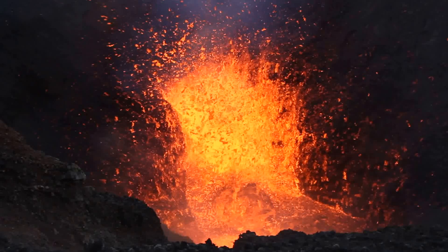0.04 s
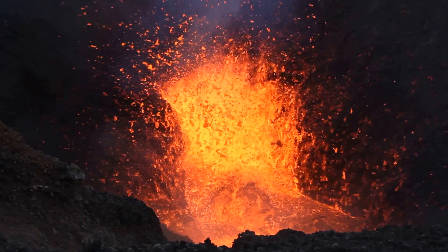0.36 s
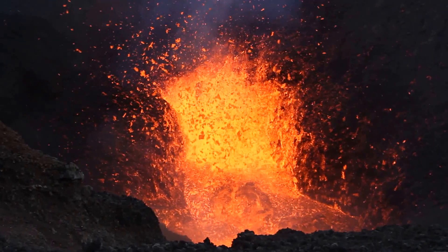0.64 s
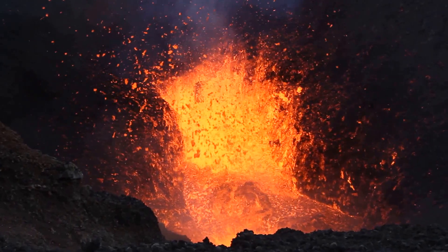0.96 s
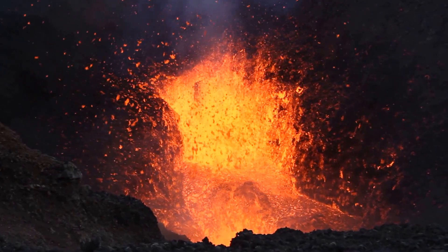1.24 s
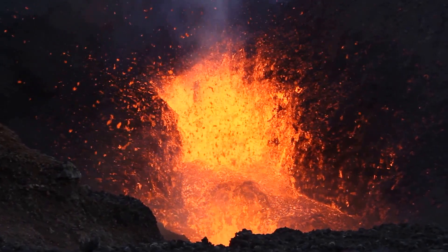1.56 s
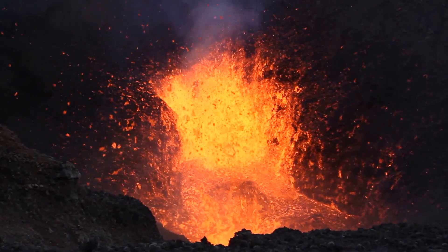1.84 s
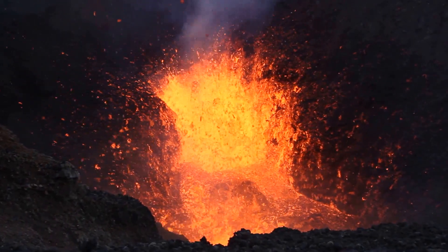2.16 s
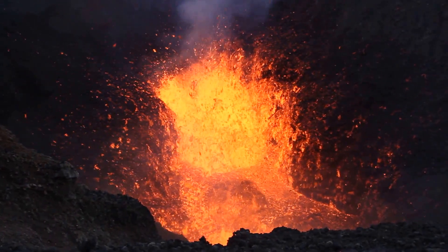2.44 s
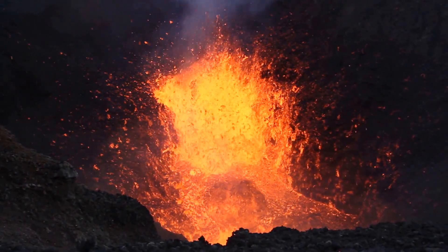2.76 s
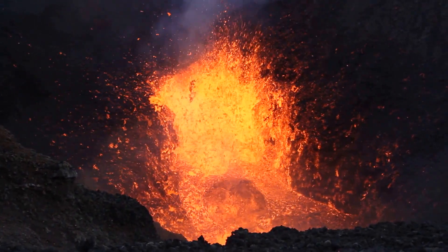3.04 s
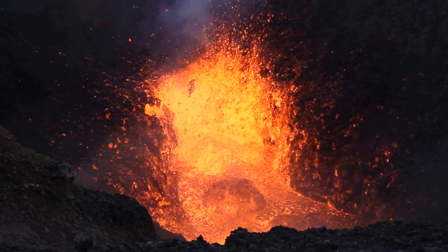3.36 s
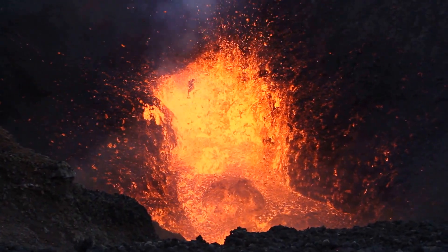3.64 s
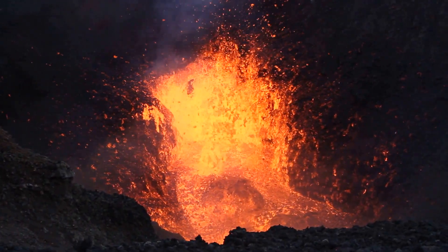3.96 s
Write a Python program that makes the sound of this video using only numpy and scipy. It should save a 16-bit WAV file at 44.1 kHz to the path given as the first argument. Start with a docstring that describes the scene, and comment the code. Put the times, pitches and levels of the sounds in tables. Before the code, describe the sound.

A lava fountain rumbles from the start, some way off outdoors, with a soft grainy hiss of falling spatter and a faint, thin electronic whine. Gas tears through in rough roaring swells, a strong one near 1 second and the biggest from 2.6 seconds, briefly pushing the other sounds down. Wind bumps the microphone, hardest just after 3 seconds, and a last gas burst comes near 3.7 seconds.

```python
"""A lava fountain plays in its crater, some way off in the open air.
From the start the vent rumbles, falling spatter makes a grainy hiss and camera electronics whine faintly.
Gas tears through the melt in rough swells, one strong near 1 s, the biggest from 2.6 s.
Wind bumps the microphone, hardest just after 3 s; a last burst of gas follows near 3.7 s.
Gain control ducks everything under the biggest swells."""
import sys
import numpy as np
from scipy import signal
from scipy.fft import rfft, irfft, next_fast_len
from scipy.io import wavfile

SR = 44100
rng = np.random.default_rng(int(sys.argv[2]) if len(sys.argv) > 2 else 0)


def generate_wav(sig):
    """Save sig (samples, or channels by samples) to the path in sys.argv[1] as 16-bit PCM at SR."""
    pcm = np.round(np.clip(np.atleast_2d(sig).T, -1, 1) * 32767).astype(np.int16)
    wavfile.write(sys.argv[1], SR, pcm)


N = 176400
TIME_S = np.arange(N) / SR
EDGES_HZ = 22 * 2 ** (np.arange(20) / 2)  # half-octave bands
CENTRES_HZ = np.sqrt(EDGES_HZ[1:] * EDGES_HZ[:-1])


def from_db(db):
    """Decibels to gain."""
    return 10 ** (np.asarray(db) / 20)


def unit_rms(x):
    """Scale to unit power."""
    return x / np.sqrt(np.mean(x ** 2) + 1e-20)


def envelope(points):
    """Gain per sample from (time_s, gain_db) points."""
    return from_db(np.interp(TIME_S, *np.transpose(points)))


def hump(centre_hz, half_width_oct):
    """Power per band: 1 at the centre, halved at half_width_oct either side."""
    return .5 ** ((np.log2(CENTRES_HZ / centre_hz) / half_width_oct) ** 2)


def lag(x, tau_s):
    """One-pole smoothing."""
    pole = np.exp(-1 / (tau_s * SR))
    return signal.lfilter([1 - pole], [1, -pole], x)


def drift(rate_hz):
    """Smooth random wander of unit RMS."""
    step, warmup = 20, 2000
    pole = np.exp(-2 * np.pi * rate_hz * step / SR)
    noise = rng.standard_normal(N // step + warmup + 2)
    slow = signal.lfilter([1], [1, -2 * pole, pole * pole], noise)[warmup:]
    return np.interp(np.arange(N) / step, np.arange(len(slow)), unit_rms(slow))


def coloured(x, points):
    """Filter by a curve of (freq_hz, gain_db) points."""
    freq_hz, gain_db = np.transpose(points)
    size = next_fast_len(N + SR // 2)
    bins_hz = np.maximum(np.arange(size // 2 + 1) * SR / size, 1)
    response = from_db(np.interp(np.log(bins_hz), np.log(freq_hz), gain_db))
    return irfft(rfft(x, size) * response, size)[:N]


def turbulence(band_gains, flicker_db):
    """Half-octave noise bands, each with its own gain and flicker."""
    out = np.zeros(N)
    for k, gain in enumerate(band_gains):
        bandpass = signal.butter(4, EDGES_HZ[k:k + 2], "band", fs=SR, output="sos")
        band = signal.sosfilt(bandpass, rng.standard_normal(N + SR // 2))[-N:]
        flicker = from_db(flicker_db * drift(rate_hz=22))
        out += gain * unit_rms(band * flicker)
    return out


def steady_noise(spectrum, flicker_db):
    """Turbulence of equal power per band, shaped by a spectrum."""
    return coloured(turbulence(np.ones(len(CENTRES_HZ)), flicker_db), spectrum)


def whine(pitch_hz=15666, rms_db=-57):
    """Thin tone of the camera's electronics."""
    return from_db(rms_db) * np.sqrt(2) * np.sin(2 * np.pi * pitch_hz * TIME_S)


# Wind strength: time_s, gain_db
GUST_CURVE = [(0, -4), (0.65, -12), (1.6, 2), (2.2, -8), (2.75, 4), (2.9, 8.5), (3.08, 15), (3.25, 3.5),
              (3.7, 1), (3.8, -13), (4, 0.5)]
# Buffeting spectrum: freq_hz, gain_db
BUFFET_COLOUR = [(25, -54), (40, -36), (75, -29.5), (110, -25), (200, -49.5), (500, -75)]
# Single bumps of air: centre_s, peak_db, pitch_hz
AIR_BUMPS = [(.535, -17, 126), (.592, -15.5, 135), (0.734, -9, 107), (0.804, -14.5, 95), (2.405, -7, 140),
             (2.994, -9, 86), (3.068, 2, 102), (3.703, -2, 110)]


def wind(gain_db=-1.5, bump_sigma_cycles=.42):
    """Gusts buffet the microphone; single low bumps last about one cycle."""
    buffet = from_db(gain_db) * envelope(GUST_CURVE) * steady_noise(BUFFET_COLOUR, flicker_db=2)
    for centre_s, peak_db, pitch_hz in AIR_BUMPS:
        cycles = (TIME_S - centre_s) * pitch_hz
        window = np.exp(-.5 * (cycles / bump_sigma_cycles) ** 2)
        buffet += from_db(peak_db) * window * np.cos(2 * np.pi * cycles)
    return buffet


# Spectrum of falling spatter: freq_hz, gain_db
SPATTER_COLOUR = [(200, -46.5), (600, -33.5), (1500, -35.5), (3000, -35.5), (4500, -35.5), (6500, -44.5),
                  (9000, -48), (11500, -50.5), (15000, -58)]


def spatter(ticks_per_s=2200, tick_spread_db=3.4, tick_gain_db=1.5):
    """Countless far drops blur into hiss; nearer cinders tick through it."""
    sizes = from_db(tick_spread_db * np.minimum(rng.exponential(1, N), 5))
    signs = rng.choice([-1, 1], N)
    landings = rng.random(N) < ticks_per_s / SR
    ticks = coloured(unit_rms(sizes * signs * landings), SPATTER_COLOUR)
    hiss = steady_noise(SPATTER_COLOUR, flicker_db=1)
    return hiss + from_db(tick_gain_db) * ticks


# Clot and cinder landings: centre_s, level_db, width_s, pitch_hz
LANDINGS = [(.205, -40, .003, 11000), (1.81, -42, .02, 5000), (2.54, -32, 0.014, 4500)]


def splashes(half_width_oct=.47):
    """Clots and cinders land with short, bright puffs of noise."""
    power = np.zeros((len(CENTRES_HZ), N))
    for centre_s, level_db, width_s, pitch_hz in LANDINGS:
        puff = from_db(level_db) ** 2 * np.exp(-((TIME_S - centre_s) / width_s) ** 2)
        power += np.outer(hump(pitch_hz, half_width_oct), puff)
    return turbulence(np.sqrt(power), flicker_db=1)


# Rumble strength: time_s, gain_db
RUMBLE_CURVE = [(.04, 4.5), (.15, 4), (.28, -4), (.75, -8), (1.0, -1.5), (1.12, 2.5), (1.28, 2.5),
                (1.47, -13.5), (1.67, 3), (1.82, -2), (1.95, -10.5), (2.4, .5), (2.58, -3.5), (2.76, 5),
                (2.85, 13.5), (2.96, 0.5), (3.08, 7), (3.36, -6), (3.47, 0.5), (3.7, 2), (3.77, -1),
                (4.0, -2)]
# Rumble spectrum: freq_hz, gain_db
RUMBLE_COLOUR = [(25, -58.3), (60, -39), (105, -26), (170, -22), (260, -23.5), (400, -35.5), (800, -45.5),
                 (2000, -80.4)]


def rumble(gain_db=-.5):
    """The churning vent, strongest between 100 and 300 Hz."""
    return from_db(gain_db) * envelope(RUMBLE_CURVE) * steady_noise(RUMBLE_COLOUR, flicker_db=1.5)


# Bursts of gas: start_s, rise_s, hold_s, fall_tau_s, gain_db, centre_hz, half_width_oct
GAS_BURSTS = [ (0, .10, .13, 0.086, -20, 650, 1.4), (0.851, .06, 0.12, 0.4, -27, 646, 2),
              (0.973, 0.12, .07, 0.13, -13.8, 990, 1.0), (1.195, 0.088, 0.033, 0.044, -20, 680, 1.4),
              (1.631, 0.055, .04, 0.17, -24.5, 970, 1.6), (1.746, 0.064, 0.025, 0.037, -23.5, 2330, 1.4),
              (1.864, 0.41, 0.27, 0.26, -26.5, 970, 1.17), (2.6, 0.14, 0.018, 0.086, -12, 1810, 1.14),
              (2.736, 0.061, .06, 0.065, -13.5, 950, 1.14), (2.989, 0.092, 0.031, 0.084, -20, 1150, 1.05),
              (3.214, 0.081, 0.013, 0.036, -23.5, 1524, 0.46), (3.399, 0.085, .04, 0.48, -26, 820, 1.47),
              (3.638, 0.12, 0.081, 0.072, -15, 1820, 0.78)]
# Filtering by vent and distance: freq_hz, gain_db
VENT_COLOUR = [(100, 1.86), (2500, -1.8), (4400, 0.0), (5300, -5.5), (6500, -12), (9000, -19), (15000, -37)]


def gas_bursts(shudder_db=1.04, shudder_hz=134):
    """Gas tears through the melt as jet noise that swells, holds and dies; all bands shudder together."""
    power = np.zeros((len(CENTRES_HZ), N))
    for start_s, rise_s, hold_s, fall_tau_s, gain_db, centre_hz, half_width_oct in GAS_BURSTS:
        age_s = TIME_S - start_s
        rise = np.clip(age_s / rise_s, 0, 1)
        fall = np.exp(-np.maximum(age_s - rise_s - hold_s, 0) / fall_tau_s)
        power += np.outer(hump(centre_hz, half_width_oct), (from_db(gain_db) * rise * fall) ** 2)
    shudder = unit_rms(from_db(shudder_db * drift(shudder_hz)))
    jet = turbulence(np.sqrt(power), flicker_db=.22)
    return shudder * coloured(jet, VENT_COLOUR)


def gain_control(x, threshold_db=-15, cut_db_per_db=1.156):
    """Sluggish gain reduction when the level passes the threshold."""
    level_db = 10 * np.log10(lag(x ** 2, tau_s=.002) + 1e-12)
    excess_db = np.maximum(level_db - threshold_db, 0)
    cut_db = lag(cut_db_per_db * excess_db, tau_s=.073)
    return x * from_db(-cut_db)


def scene():
    """Fountain and wind at one microphone."""
    return (gas_bursts() + rumble() + spatter() + splashes() + wind())[None]


def record(dry, start_s=.036, cutoff_hz=15750):
    """Add the whine, mute until start_s, duck the swells, clip the peaks, low-pass."""
    heard = (dry + whine()) * (TIME_S >= start_s)
    clipped = np.clip(gain_control(heard), -1, 1)
    lowpass = signal.ellip(12, .1, 80, cutoff_hz, fs=SR, output="sos")
    return signal.sosfilt(lowpass, clipped)


dry = scene()
out = record(dry)
generate_wav(out)
```